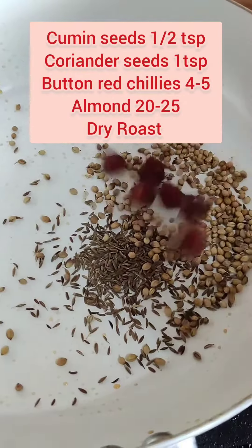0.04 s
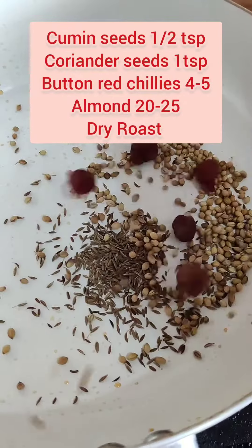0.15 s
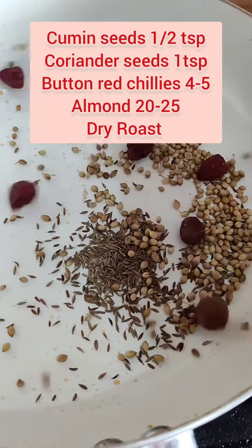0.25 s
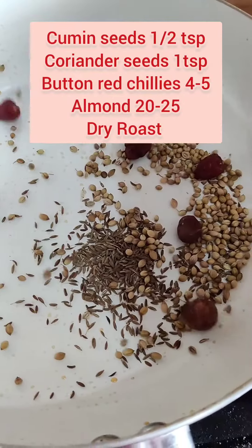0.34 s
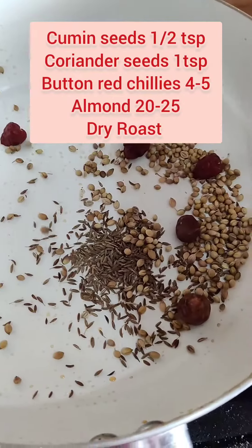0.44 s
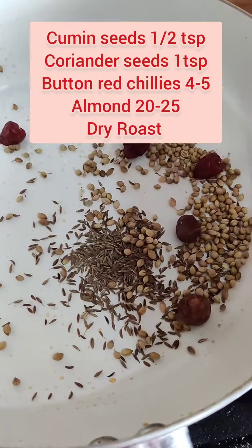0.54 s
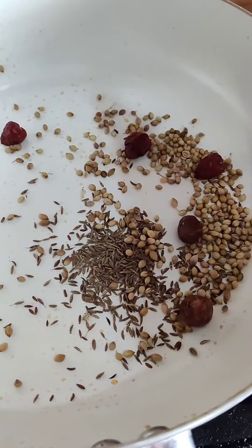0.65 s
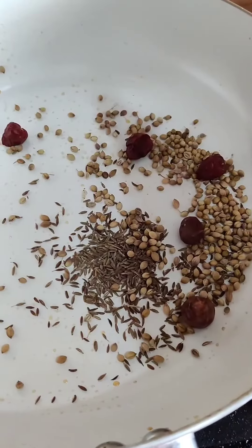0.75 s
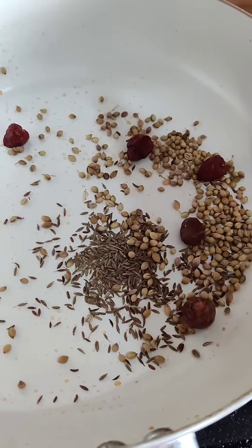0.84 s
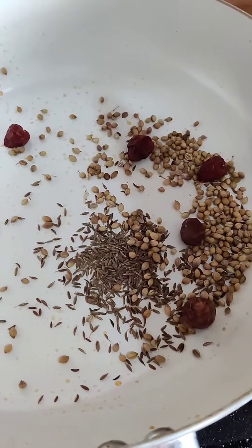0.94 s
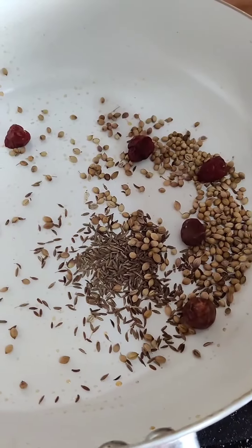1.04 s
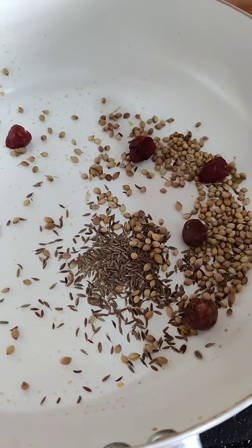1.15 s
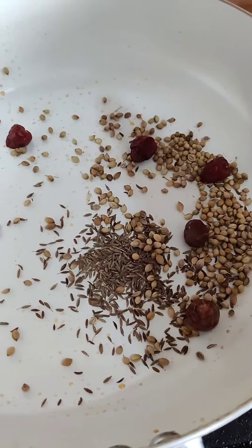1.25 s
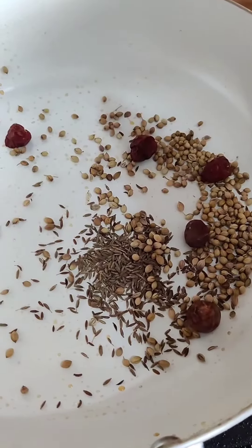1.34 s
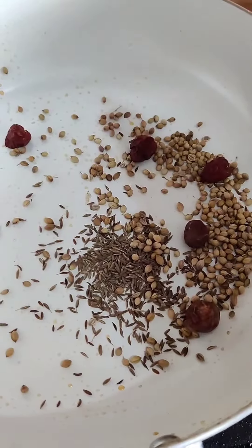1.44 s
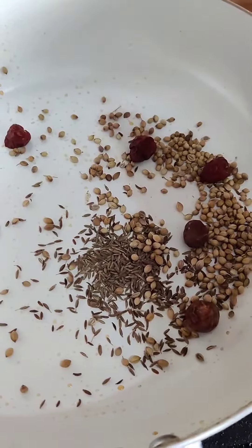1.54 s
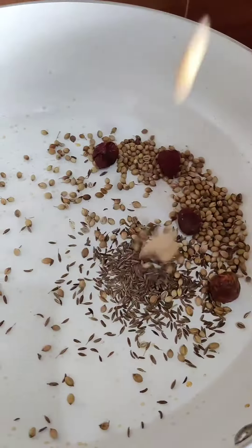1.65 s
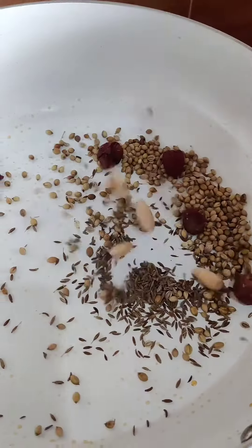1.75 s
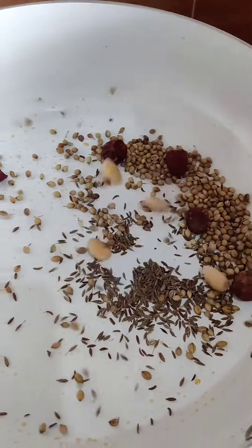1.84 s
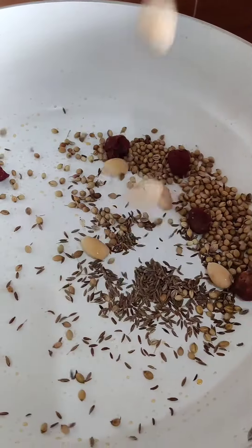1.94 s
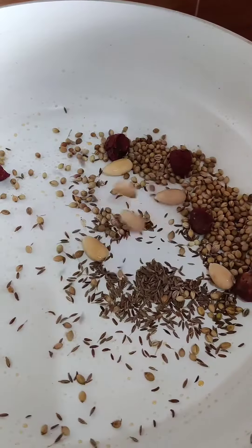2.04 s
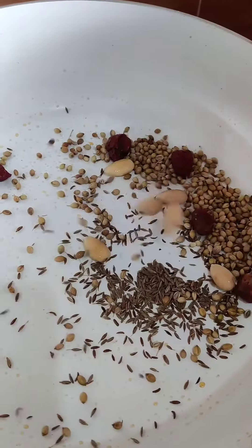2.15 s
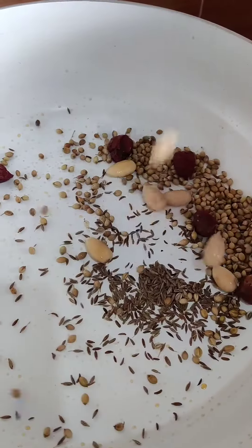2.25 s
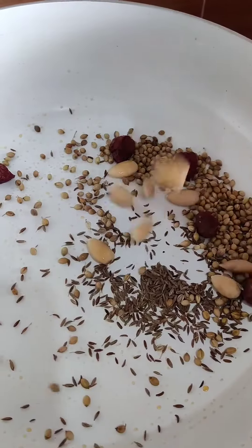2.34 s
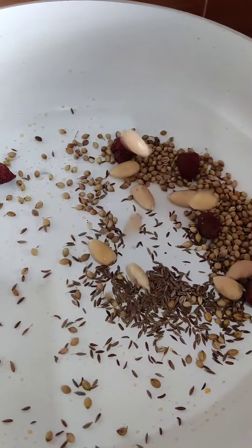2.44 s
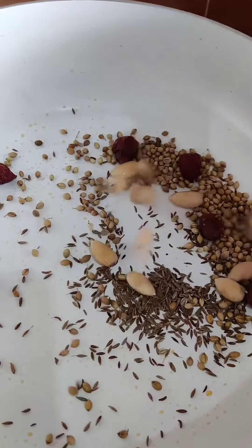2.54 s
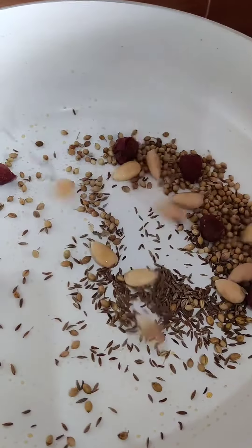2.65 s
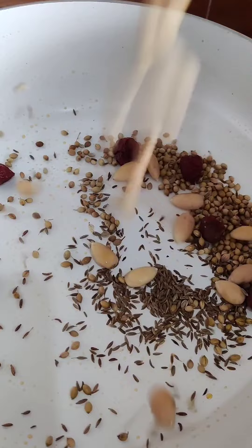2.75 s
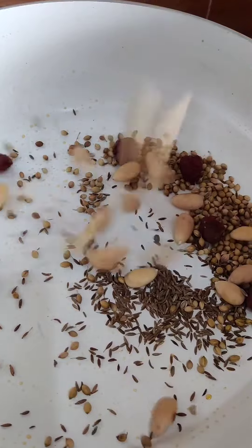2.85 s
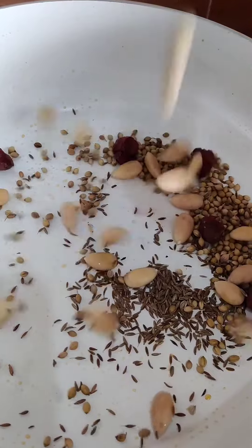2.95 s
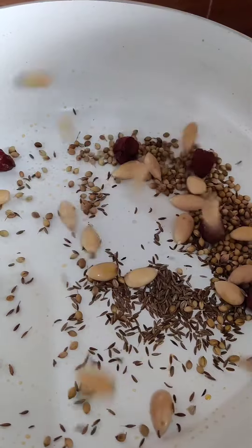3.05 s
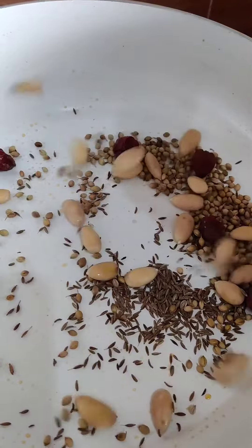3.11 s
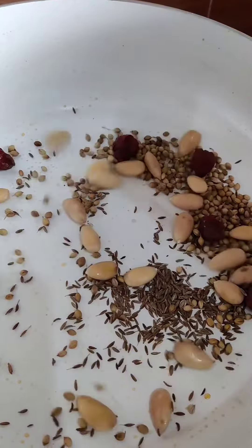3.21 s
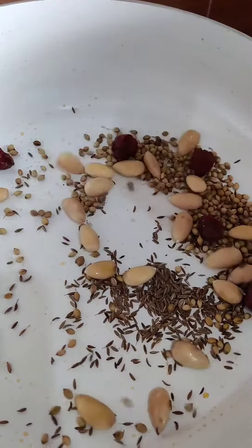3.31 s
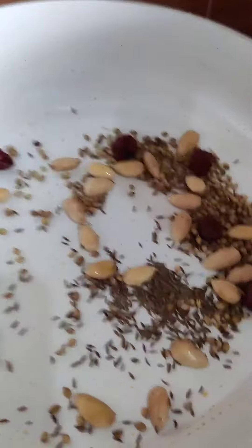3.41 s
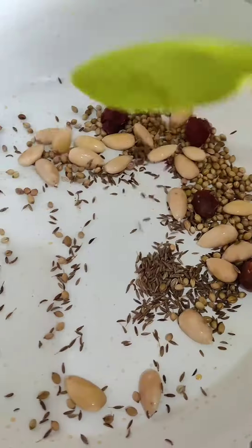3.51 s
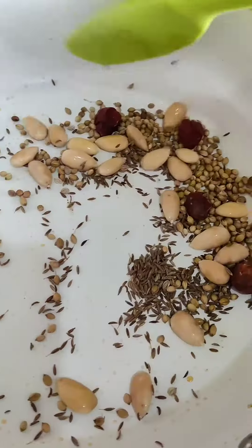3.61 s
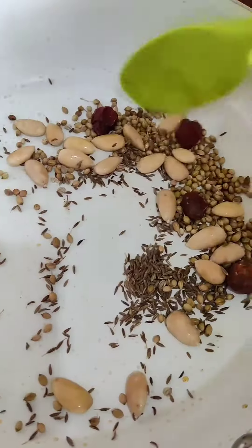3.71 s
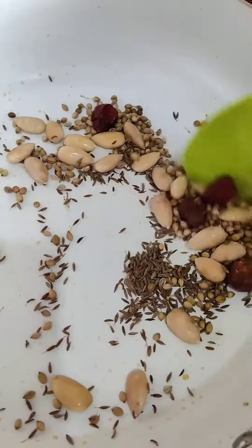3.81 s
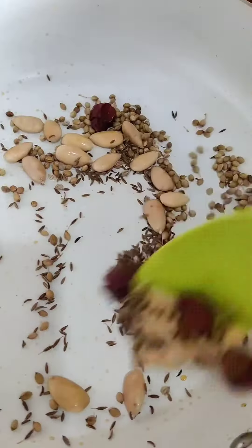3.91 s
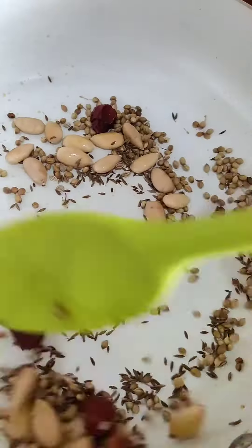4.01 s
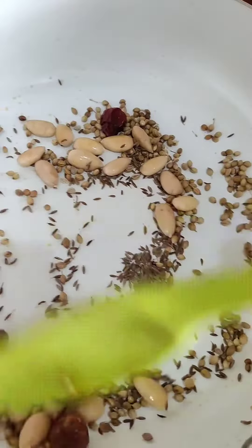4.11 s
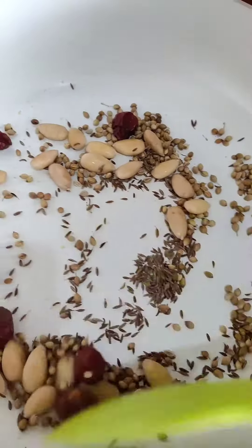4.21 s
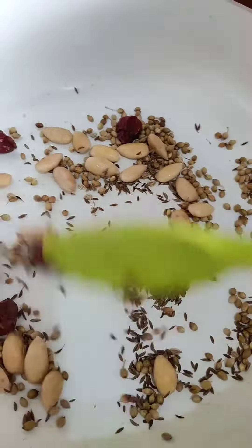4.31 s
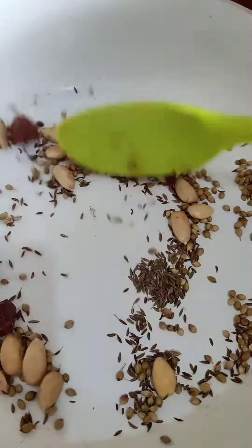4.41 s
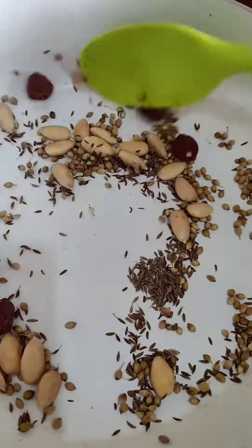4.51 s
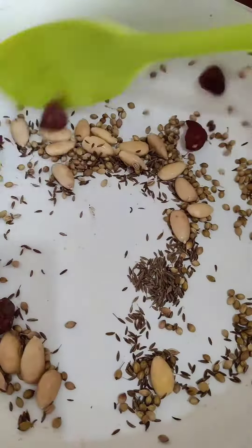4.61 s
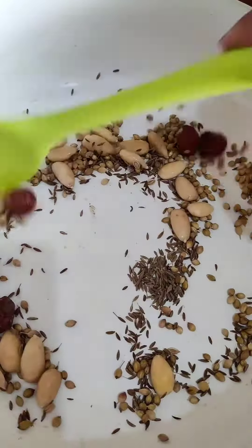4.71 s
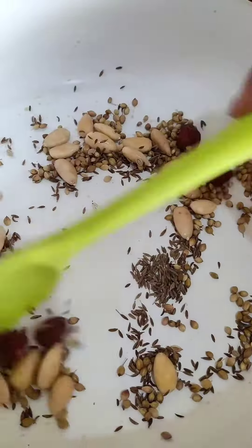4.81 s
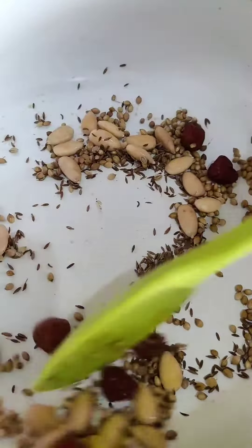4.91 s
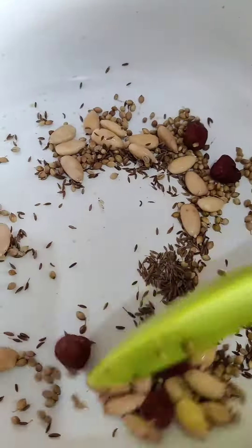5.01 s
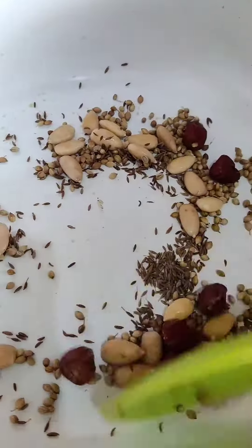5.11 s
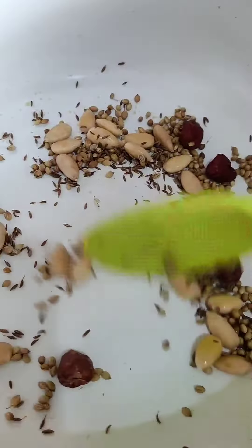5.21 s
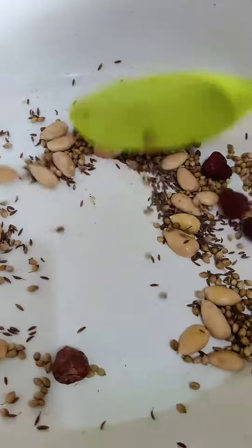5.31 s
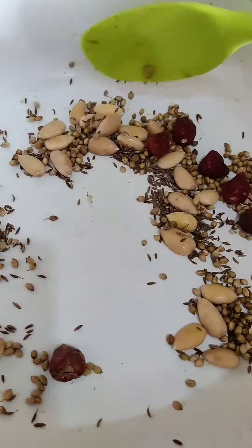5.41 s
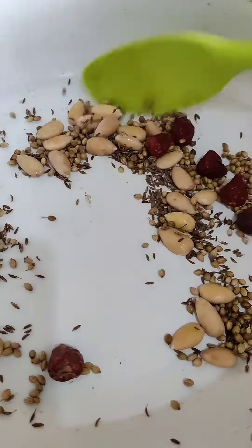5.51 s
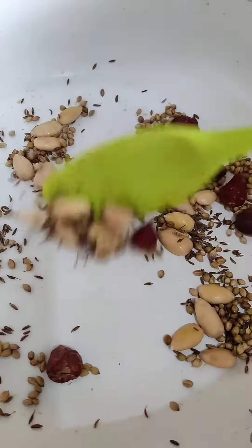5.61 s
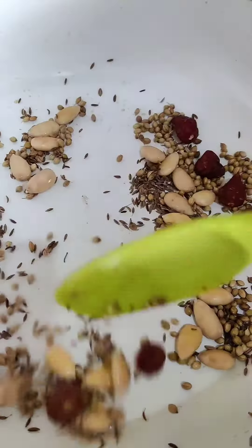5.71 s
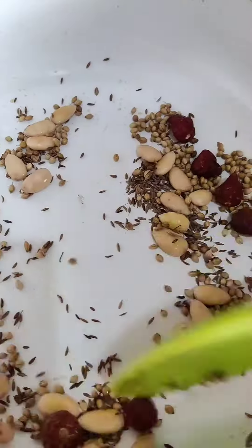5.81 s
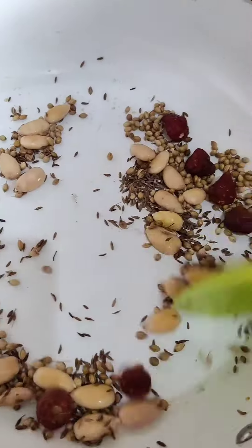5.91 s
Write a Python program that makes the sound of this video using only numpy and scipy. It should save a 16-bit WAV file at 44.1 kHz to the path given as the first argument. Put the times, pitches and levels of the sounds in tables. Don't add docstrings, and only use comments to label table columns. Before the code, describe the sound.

Dried chillies and then almonds clatter into a dry pan, ringing it dully, before a soft spatula sweeps rattling seeds and nuts around.

```python
import sys
import numpy as np
from scipy import signal
from scipy.fft import rfft, irfft, next_fast_len
from scipy.io import wavfile
from scipy.ndimage import uniform_filter1d

SR = 44100
rng = np.random.default_rng(int(sys.argv[2]) if len(sys.argv) > 2 else 0)


def pcm_store(signal):
    levels = np.round(np.clip(np.atleast_2d(signal), -1, 1) * 32767)
    wavfile.write(sys.argv[1], SR, levels.astype(np.int16).T)


def voltage_ratio(decibels):
    exponent = np.asarray(decibels, float) / 20
    return 10 ** exponent


N = 262836

CUTS_S = [
    1.53,
    1.648,
    3.455,
]
# (frequency [Hz], level [dB per Hz])
SEED_SPECTRUM = [(880, -47.5), (1500, -14.5), (1920, -14.5), (2750, -8.5), (3150, -9.5), (3910, -11),
                 (4270, -4), (4990, -6.5), (5500, -2.5), (6430, -1.5), (8130, -10.5), (14500, -17.5),
                 (15500, -35.5)]


def rms_one(x):
    return x / np.sqrt(np.mean(x ** 2) + 1e-20)


def shot_now():
    return np.searchsorted(CUTS_S, np.arange(N) / SR)


def at_hz(points, hz):
    table_hz, values = np.transpose(points)
    return np.interp(np.log(hz), np.log(table_hz), values)


def left_over_right(db):
    return voltage_ratio([[db / 2], [-db / 2]])


def band(x, order, low_hz, high_hz):
    return signal.sosfilt(signal.butter(order, [low_hz, high_hz], "band", fs=SR, output="sos"), x)


def die_away(clicks, t60_s):
    return signal.lfilter([1], [1, -voltage_ratio(-60 / (t60_s * SR))], clicks)


def drift(rate_hz):
    r = np.exp(-2 * np.pi * rate_hz * 40 / SR)
    slow = signal.lfilter([1], [1, -2 * r, r * r], rng.standard_normal(N // 40 + 2002))[2000:]
    return np.interp(np.arange(N) / 40, np.arange(len(slow)), rms_one(slow))


def ring(clicks, hz, t60_s):
    r, w = voltage_ratio(-60 / (t60_s * SR)), 2 * np.pi * hz / SR
    return signal.lfilter([0, np.sin(w)], [1, -2 * r * np.cos(w), r * r], clicks + 1e-18)


def colour(x, spectrum):
    hz = np.maximum(np.fft.rfftfreq(N, 1 / SR), 1)
    return rms_one(irfft(rfft(x) * voltage_ratio(at_hz(spectrum, hz)), N))


def grains(per_s, spread_db):
    sizes = voltage_ratio(spread_db * np.minimum(rng.exponential(1, N), 5)) * rng.choice([-1, 1], N)
    return sizes * (rng.random(N) < per_s / SR)


def gain_control():
    # (kitchen [dB], creep [dB/s], ceiling [dB], fade depth [dB], fade [s])
    gains = [
        (-51.2, 3.4, -45, 16, .03),
        (-103, 180, -80, 0.5, .02),
        (-57.5, 12.8, -41.5, 22, .06),
        (-51.5, 2.8, -42, 36, .1),
    ]
    shot = shot_now()
    since_s = np.arange(N) / SR - np.array([0] + CUTS_S)[shot]
    level_db, creep, ceiling_db, depth_db, fade_s = np.array(gains)[shot].T
    fade_db = -depth_db * np.exp(-since_s / fade_s)
    return np.minimum(level_db + creep * since_s, ceiling_db) + fade_db, fade_db


def kitchen(level_db, fade_db, patchy_db):
    # (frequency [Hz], level [dB per Hz])
    noise_spectrum = [(12, -28), (20, 6), (92, -7.5), (171, -8), (202, -24), (266, -14), (352, -16),
                      (649, -23), (932, -21), (1160, -33), (2470, -26.5), (3170, -31), (5850, -31),
                      (11400, -48), (15500, -64)]
    # (frequency [Hz], level over kitchen [dB])
    motor = [(199.7, -6.5), (299.5, -20), (399.4, -22), (800, -22.5), (955, -26.5)]
    # (frequency [Hz], correlation [-1..1])
    likeness = [(60, 0.81), (180, 0.93), (550, 0.44), (1650, 0.16), (4970, -0.28), (15000, -0.41)]
    # (frequency [Hz], left minus right [dB])
    balance = [(60, 5.5), (240, 5.5), (950, 2), (3770, 0.5), (15000, -8)]
    deep_by_shot = [-0.5, -6, -5.5, -5.5]
    # low [Hz], high [Hz], level over kitchen [dB]
    port_hiss = (10900, 12100, -47)
    rumble = 0
    edges_hz = 20 * 2 ** np.arange(0, 10, .5)
    white = rng.standard_normal((2, 2, N))
    deep_db = np.array(deep_by_shot)[shot_now()]
    for k, (low_hz, high_hz) in enumerate(zip(edges_hz, edges_hz[1:])):
        mid, side = band(white[k % 2], 2, low_hz, high_hz)
        hz = np.sqrt(low_hz * high_hz)
        alike = np.clip(at_hz(likeness, hz), -1, 1)
        pair = np.sqrt(1 + alike) * mid + np.sqrt(1 - alike) * side * [[1], [-1]]
        band_db = at_hz(noise_spectrum, hz) + patchy_db * drift(4.1) + deep_db * (hz < 60)
        band_db = band_db + 0.6 * fade_db * (hz < 170)
        rumble = rumble + voltage_ratio(band_db) * pair * left_over_right(at_hz(balance, hz))
    t = np.arange(N) / SR
    hum = sum(voltage_ratio(db + 1.2 * drift(10)) * np.sin(2 * np.pi * hz * t) for hz, db in motor)
    low_hz, high_hz, hiss_db = port_hiss
    hiss = voltage_ratio(hiss_db + 19) * rms_one(band(white[0], 4, low_hz, high_hz))
    return voltage_ratio(level_db) * (rms_one(rumble) + hiss + hum * left_over_right(5))


def blows():
    # (time [s], low modes [dB], then over them: off centre [dB], near rim [dB],
    # hardness [dB])
    chillies = [(.029, -42.5, .5, 1, -4.5), (.086, -30.5, -14, -8.5, -9), (.099, -64.5, 29, 26.5, 11),
                (.115, -37, -3.5, 0, -3.5), (.139, -64, 21.5, 19, 11), (.206, -65, 1, 12, 21),
                (.225, -72, 21.5, 28.5, 29.5), (.259, -42, -11, -24, .5), (.293, -43, -28.5, -21.5, -6),
                (.321, -82, 25, 27, 33), (.466, -77.5, 19, 21, 22.5), (.686, -60, -16, -9, 5.5),
                (1.235, -61, 1.5, -4.5, 3.5)]
    almonds = [(1.653, -50.5, -29.5, -17, -24.5), (1.735, -38.5, -35, -24, -26), (1.777, -37, 6, -1, -12.5),
               (1.85, -41, -3, -20, -13.5), (1.935, -45.5, .5, -7.5, -10), (1.984, -48, -16.5, -18.5, -5),
               (1.993, -23.5, -18.5, -27, -30), (2.039, -25.5, 2, -4, -26.5),
               (2.089, -45, -11.5, -13.5, -9.5), (2.2, -35, -10.5, -28, -22.5),
               (2.283, -40, -10, -23.5, -17.5), (2.297, -26, -4, -10.5, -22), (2.367, -19, -.5, -13, -26),
               (2.397, -19, -9, -22, -25), (2.429, -59, 5, 2, 4), (2.469, -27.5, 5, -2.5, -15.5),
               (2.556, -29.5, -2, -19, -23), (2.59, -17, -2.5, -9.5, -29.5),
               (2.647, -37.5, -12, -13, -20.5), (2.692, -28.5, 4, -6.5, -13), (2.765, -44, 12.5, -3, -15.5),
               (2.793, -11.5, -7, -20, -29), (2.815, -18.5, -19, -11.5, -14), (2.837, -18, -5, -13, -17.5),
               (2.851, -12, -10, -14, -27.5), (2.862, -8.5, -11, -18.5, -34), (2.884, -32.5, 7, -12.5, -8),
               (2.917, -22, -5.5, -7.5, -19.5), (2.921, -30, 21, 8.5, -7.5), (2.946, -23, -9.5, -23, -16.5),
               (2.984, -31.5, -5.5, -23, -17.5), (3.043, -20.5, -3, -21, -24), (3.051, -24.5, 3, -4.5, -16),
               (3.084, -48, -4.5, -9, 2), (3.104, -29.5, -8, -19, -16), (3.126, -36.5, -6.5, -8.5, -2.5),
               (3.184, -34.5, 5.5, -7.5, -17), (3.219, -43, 0, -16, -16), (3.263, -42, -1, -21.5, -12),
               (3.33, -45.5, -2.5, -16, -10)]
    knocks = [(3.996, -67.5, 13, 2, 5), (4.361, -47, -4, -15, -4), (4.397, -41.5, -5, -23, -1.5),
              (4.543, -46, -3.5, -22, -1.5), (4.833, -61, 18.5, 19.5, 22.5), (5.082, -60.5, 6, 9, 5),
              (5.124, -45.5, -6.5, -16, 3.5), (5.206, -47, 1, 0, -3), (5.258, -42.5, -8, -22, -24),
              (5.295, -42, -5, -13.5, -8), (5.383, -60.5, 7, -9, -12), (5.569, -52.5, -1, -10, 8),
              (5.606, -39.5, -31.5, -36.5, -19.5), (5.631, -39, -21.5, -21.5, -22.5),
              (5.673, -39.5, -11, -13, -10), (5.696, -45.5, 7, -4, -3), (5.726, -45, 3.5, 0, -2),
              (5.867, -60.5, 14, 1, 11.5)]
    s, low, *over_low = np.transpose(chillies + almonds + knocks)
    return np.round(s * SR).astype(int), np.array([low, *(low + over_low)])


def movement(fade_db):
    # (seed rattle [dB], nuts rolling [dB])
    resting = [
        (-71.5, -80),
        (-97, -97),
        (-61.5, -60),
        (-71, -75),
    ]
    # start [s], onset [s], seed rattle [dB], nuts rolling [dB]
    stirring = (3.78, .05, -55.5, -68)
    # (peak [s], time to sink 10 dB [s], seed rattle [dB], nuts rolling [dB])
    scatters = [(.1, .3, -52, -62), (.16, .07, -62, -45), (.215, .2, -55, -55), (.39, .12, -58, -62),
                (.74, .08, -68, -78), (1.45, .03, -64, -85), (1.76, .08, -63, -48), (1.85, .12, -61, -48),
                (2.47, .1, -64, -46), (2.6, .1, -60, -50), (2.71, .1, -60, -44), (2.81, .12, -55, -42),
                (2.945, .12, -45, -37), (3.02, .06, -49, -46), (3.22, .06, -49, -51), (5.55, .1, -50, -56)]
    # (peak [s], time to sink 10 dB [s], seed rattle [dB], nuts rolling [dB])
    strokes = [(3.86, .09, -51, -72), (4.08, .07, -48.5, -63), (4.38, .06, -51, -57),
               (4.56, .07, -49.5, -61), (4.87, .14, -44.5, -54), (5.27, .11, -47.5, -55),
               (5.63, .05, -53, -48), (5.75, .06, -45, -50), (5.94, .15, -52, -62)]
    t, shot = np.arange(0, N, 32) / SR, shot_now()[::32]
    power = voltage_ratio(2 * (np.array(resting)[shot].T + fade_db[::32]))
    start_s, onset_s, seeds_db, nuts_db = stirring
    power += voltage_ratio([[2 * seeds_db], [2 * nuts_db]]) * np.clip((t - start_s) / onset_s + 1, 0, 1) ** 2
    for rows, rise_over_sink in ((scatters, 0.2), (strokes, 1.2)):
        for s, sink_s, seeds_db, nuts_db in rows:
            away = np.where(t < s, (s - t) / rise_over_sink, t - s) / sink_s
            here = shot == np.searchsorted(CUTS_S, s)
            power += voltage_ratio([[2 * seeds_db], [2 * nuts_db]]) * voltage_ratio(-20 * away) * here
    wobble_db, wobble_t60_s = -34, 0.5
    at, blow_db = blows()
    for s, low_db in zip(at / SR, blow_db[:2].max(axis=0)):
        after = (t >= s) & (shot == np.searchsorted(CUTS_S, s))
        power[1, after] += voltage_ratio(2 * (low_db + wobble_db - 60 * (t[after] - s) / wobble_t60_s))
    return 10 * np.log10(np.repeat(power, 32, axis=1)[:, :N])


def seeds(rattle_db):
    # (time [s], peak [dB], frequency [Hz])
    crowd_ticks = [(3.5319, -45, 6280), (3.713, -39, 7200), (3.7672, -43.5, 5690), (3.8038, -35.5, 5690),
                   (3.9056, -41, 6400), (3.9366, -41, 6180), (4.029, -47, 6300), (4.0596, -46, 5660),
                   (4.3938, -43, 6340), (4.477, -36, 5680), (4.4906, -33, 5540), (4.5337, -45, 4100),
                   (4.6888, -38, 3770), (4.7978, -42, 5660), (4.8125, -28, 5530), (4.8323, -46, 6400),
                   (4.8963, -29, 6930), (5.0398, -40, 5280), (5.059, -40, 4100), (5.1275, -38, 5240),
                   (5.1595, -32, 6600), (5.2912, -47, 5700), (5.3089, -28, 6100), (5.4589, -36, 6250),
                   (5.5504, -28, 5800), (5.6195, -36, 4300), (5.6644, -42, 6350), (5.7053, -36, 4200),
                   (5.884, -41, 6500)]
    # (time [s], peak [dB], frequency
    # [Hz])
    more_ticks = [(0.3225, -31.5, 4350), (0.3364, -39, 4200), (0.4687, -36.5, 4270), (0.6848, -38.5, 4160),
                  (3.5546, -53, 6350), (3.65, -55, 6530), (3.7443, -47, 6100), (4.1818, -56, 6330),
                  (4.2054, -50, 6200), (4.491, -29.5, 3150), (4.771, -44, 6050), (4.961, -50, 6300),
                  (4.8327, -32, 4390)]
    per_s = 2500 * voltage_ratio(1.7 * drift(9.2))
    common = grains(per_s, spread_db=2.0)
    rustle = [colour(common + 0.98 * grains(per_s, spread_db=3.5), SEED_SPECTRUM) for port in range(2)]
    ticks = np.zeros(N)
    span_s = np.arange(600) / SR
    for s, db, hz in list(crowd_ticks) + list(more_ticks):
        i = round(s * SR)
        burst = np.sin(2 * np.pi * hz * span_s) + 1.37 * rng.standard_normal(len(span_s))
        burst = burst * voltage_ratio(db - 8 - 60 * span_s / 0.021)
        ticks[i:i + len(burst)] += burst[:N - i]
    return voltage_ratio(rattle_db) * np.array(rustle), band(ticks, 3, 1900, 7200) + voltage_ratio(-25) * ticks


def pan(rolling_db, rattle_db):
    # (frequency [Hz], level [dB], t60 [s])
    mode_groups = [
        [(600.2, -13, 0.27), (610.8, -3.5, 0.077), (655, -10.5, 0.088), (825, -11.5, 0.12), (745, -9, 0.035)],
        [(1138.7, -0.5, 0.075), (1162, -10, 0.035), (1164, -11.5, .04)],
        [(1700, -6.5, 0.025), (1840, -14.5, 0.059), (1907, -2.5, 0.048), (2100, -13.5, 0.044),
         (2263, -11, 0.015), (2400, -12.5, .05), (2607, -13, 0.022), (3159, -9, 0.048), (3020, -12.5, 0.035),
         (3210, -17, 0.03)],
        [(4180, -1.5, 0.025), (4800, -32.5, 0.064), (5635, -2, 0.06), (6350, -13, 0.062), (6700, -11, 0.01)],
    ]
    at, blow_db = blows()
    rolling = rms_one(grains(900, spread_db=2.5))
    murmur_db = [rolling_db - 24.5, rolling_db - 28, rattle_db - 36.5, rattle_db - 29.5]
    body = np.zeros(N)
    for group, modes in enumerate(mode_groups):
        for k, (hz, db, t60_s) in enumerate(modes):
            clicks = rolling * voltage_ratio(murmur_db[group] + db)
            spot_db = rng.normal(0, 2.5, len(at))
            clicks[at] += voltage_ratio(blow_db[group] + db + 1.5 + spot_db)
            sign = (-1) ** k if group == 2 else 1
            body += sign * ring(clicks, hz, t60_s)
        if group == 0:
            body = 0.41 * body + 0.65 * rms_one(ring(body, 638, 0.034)) * np.std(body)
    body = band(body, 6, 605, 7000)
    body = signal.lfilter(*signal.iirnotch(993, 6.0, SR), body)
    clack = np.zeros(N)
    clack[at] = voltage_ratio(blow_db[2] - 5)
    clack = die_away(clack, 0.042) * rng.standard_normal(N)
    body = body + band(clack, 2, 1600, 4600)
    thrown = np.zeros(N)
    thrown[at] = voltage_ratio(blow_db[3] + 1)
    spray = np.array([colour(port, SEED_SPECTRUM) for port in rng.standard_normal((2, N))])
    spray = signal.lfilter(*signal.butter(1, 8000, fs=SR), spray)
    return body, voltage_ratio(1.7) * die_away(thrown, 0.06) * spray


def room(x):
    t60_s, wall_cut_hz = 0.33, 14000
    size = next_fast_len(N + SR // 2)
    hz, shot = np.fft.rfftfreq(size, 1 / SR), shot_now()
    walls = np.zeros((2, len(hz)), complex)
    for k, lag_s in enumerate(rng.uniform(.008, .03, 16)):
        loop = voltage_ratio(-60 * lag_s / t60_s) * np.exp(-2j * np.pi * hz * lag_s) / (1 + 1j * hz / wall_cut_hz)
        walls[k % 2] += loop / (1 - loop) * (-1) ** (k // 2)
    echo = np.zeros((2, N))
    for k in range(len(CUTS_S) + 1):
        echo += irfft(walls * rfft(x * (shot == k), size), size)[:, :N] * (shot == k)
    return echo


def crockery():
    # (time [s], frequency [Hz], level [dB], t60 [s])
    clinks = [(1.262, 640, -46.5, 0.2), (1.335, 630, -49, .25)]
    t = np.arange(N) / SR
    out = np.zeros(N)
    for s, hz, db, t60_s in clinks:
        attack = np.clip((t - s) / 0.0077, 0, 1)
        out += voltage_ratio(db - 60 * np.abs(t - s) / t60_s) * attack * np.sin(2 * np.pi * hz * t)
    return out


def snaps():
    # (time [s], level [dB])
    splits = [(2.297, -52), (2.56, -54), (3.126, -50), (3.713, -55), (3.745, -58), (4.394, -50),
              (4.492, -53), (4.771, -51), (4.897, -51), (5.128, -51), (5.352, -51), (5.459, -54),
              (5.551, -47)]
    clicks = np.zeros(N)
    for s, db in splits:
        clicks[round(s * SR)] = voltage_ratio(db)
    puffs = die_away(clicks + 1e-18, 0.045) * rng.standard_normal((2, N))
    bright = signal.butter(3, 7600, "high", fs=SR, output="sos")
    return signal.sosfilt(bright, puffs) * left_over_right(6)


def bump():
    # half length [s], low [Hz], high [Hz], level [dB]
    far_bump = (0.27, 196, 474, -50.5)
    half_s, low_hz, high_hz, db = far_bump
    swell = np.exp(-((np.arange(N) / SR - 5.91) / half_s) ** 2)
    return voltage_ratio(db) * swell * rms_one(band(rng.standard_normal(N), 2, low_hz, high_hz))


def scene():
    pan_left_db, seeds_left_db, right_lag_s, room_db = 10.5, 7, .00024, -20
    kitchen_db, fade_db = gain_control()
    rattle_db, rolling_db = movement(fade_db)
    rustle, ticks = seeds(rattle_db)
    body, scatter = pan(rolling_db, rattle_db)
    near = body + ticks
    ports = np.array([near, np.roll(near, round(right_lag_s * SR))]) * voltage_ratio(0.5)
    direct = left_over_right(pan_left_db) * ports
    loose = left_over_right(seeds_left_db) * (rustle + scatter)
    behind = kitchen(kitchen_db, fade_db, patchy_db=1.5) + crockery() + bump()
    return direct + loose + voltage_ratio(room_db) * room(near) + behind + snaps()


def thin_out(x):
    lean_hz, ragged_hz, ragged_db, top_hz = 7200, 14800, 6.0, 15700
    window = np.sin(np.pi * (np.arange(2048) + .5) / 2048)
    hz, t, lines = signal.stft(x, SR, window=window, nperseg=2048, noverlap=1024)
    hz = hz[:, None]
    power = uniform_filter1d(np.sum(np.abs(lines) ** 2, axis=0), size=2, axis=1)
    around = np.exp(uniform_filter1d(np.log(power + 1e-16), size=130, axis=0, mode="nearest"))
    patch = uniform_filter1d(rng.standard_normal(power.shape), size=16, axis=0)
    patch = rms_one(uniform_filter1d(patch, size=2, axis=1))
    ragged = np.clip((hz - ragged_hz - 350 * patch[0]) / 500, 0, 1)
    step_db = np.where(hz > lean_hz, 2.8, -6) + ragged_db * ragged + 1.5 * patch
    struck = around > 4 * np.roll(around, 2, axis=1)
    kept = (power > around * voltage_ratio(2 * step_db)) | struck | (hz < 2600)
    lines = lines * kept * (hz < top_hz)
    return signal.istft(lines, SR, window=window, nperseg=2048, noverlap=1024)[1][:, :N]


def top_cut(x):
    return signal.sosfilt(signal.butter(12, 15830, fs=SR, output="sos"), x)


def record(dry):
    mix = thin_out(dry)
    return top_cut(mix)


dry = scene()
out = record(dry)
pcm_store(out)
```